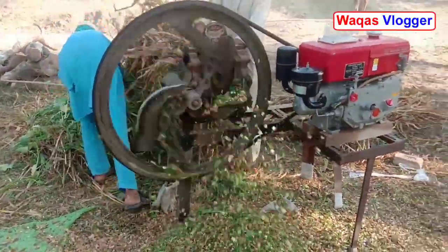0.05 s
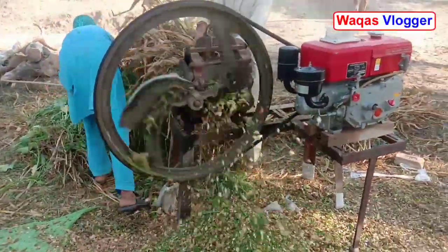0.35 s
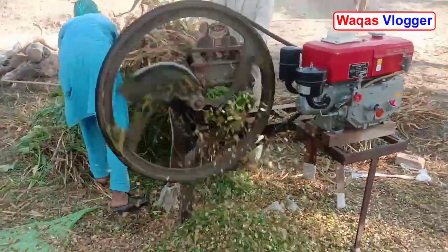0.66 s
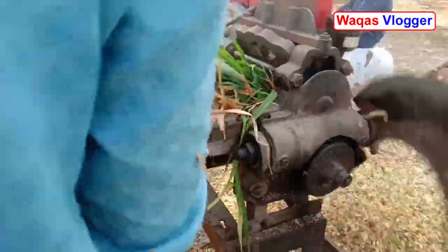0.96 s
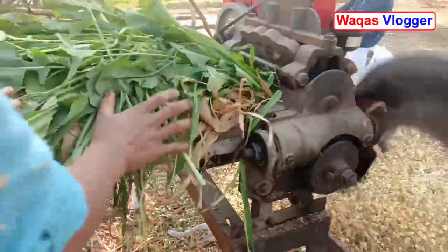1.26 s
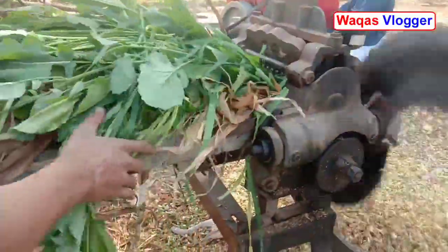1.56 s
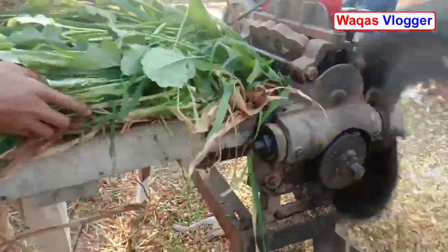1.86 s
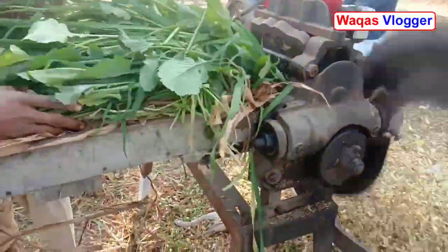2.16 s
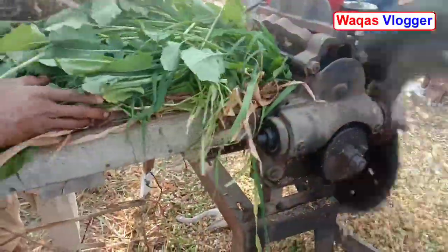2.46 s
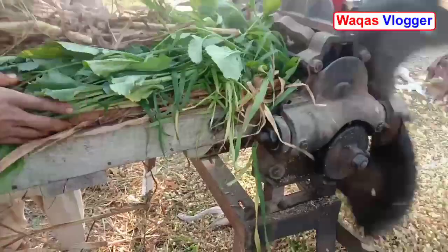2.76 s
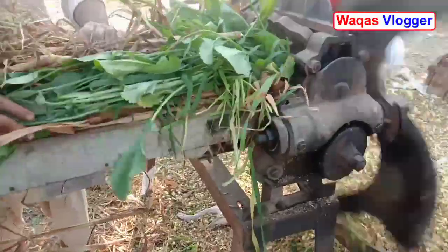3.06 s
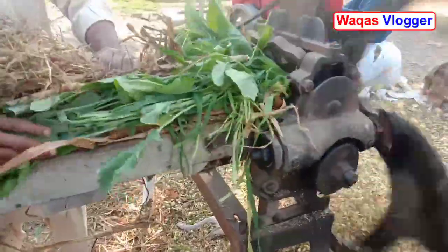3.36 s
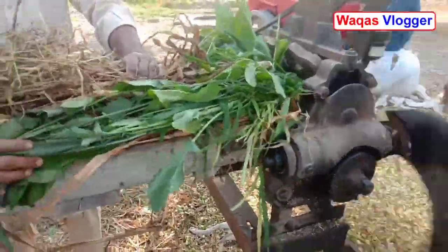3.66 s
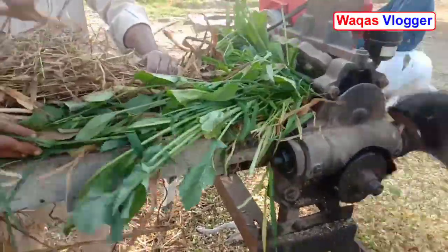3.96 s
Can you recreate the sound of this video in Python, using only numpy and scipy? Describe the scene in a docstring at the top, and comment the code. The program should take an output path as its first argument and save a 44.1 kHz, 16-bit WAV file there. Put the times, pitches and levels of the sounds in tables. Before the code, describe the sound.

A chaff cutter chops green stalks outdoors in fast crunches and metal clacks over a thumping single-cylinder diesel engine. First heard from a few steps away, it fades out briefly and returns close up, with a knife scraping rhythmically.

```python
"""Outdoors by a feed trough, a single-cylinder diesel engine drives a flywheel chaff cutter.
We hear it from a few steps away, then, after a short fade, from beside the trough.
The engine thumps and clatters at 15 cycles a second. Two knives take turns, seven cuts a second:
each crunches through green stalks and ends in a clack, while the gears set the iron frame ringing.
Up close, one knife also scrapes the mouth plate."""
import sys
import numpy as np
from scipy import signal
from scipy.fft import rfft, irfft
from scipy.io import wavfile
from scipy.ndimage import uniform_filter1d

SR = 44100
rng = np.random.default_rng(int(sys.argv[2]) if len(sys.argv) > 2 else 0)


def waveform_to_disk(signal):
    """Save audio, clipped to [-1, 1], as 16-bit WAV at the path in sys.argv[1]."""
    frames = np.transpose(np.atleast_2d(signal))
    scaled = np.clip(frames, -1, 1) * 32767
    samples = np.round(scaled).astype(np.int16)
    wavfile.write(sys.argv[1], SR, samples)


N = 176400
TIME = np.arange(N) / SR
FAR_CUT_S, NEAR_CUT_S = 0.033, 0.044  # length of one crunch

# a knife finishes its cut: end_s, clack_db, thud_db, thud_pitch_hz
CUTS = [(0.001, -11, -12.5, 600), (0.142, -12, -15, 650), (0.284, -9.5, -37, 600), (0.424, -9, -14.5, 640),
        (0.564, -11.5, -35, 547), (0.857, -9.5, -8, 524), (1.001, -10, -10, 695), (1.146, -9, -18, 586),
        (1.29, -9, -11, 447), (1.435, -9, -25, 567), (1.58, -10, -11, 510), (1.723, -7.5, -9.5, 740),
        (1.868, -8, -14, 534), (2.01, -12.5, -8, 685), (2.155, -7.5, -14, 408), (2.297, -9.5, -12.5, 620),
        (2.444, -12.5, -13, 696), (2.584, -11.5, -10, 490), (2.728, -10, -12, 584), (2.871, -9.5, -14, 492),
        (3.016, -10, -26, 790), (3.157, -9, -20, 680), (3.298, -7, -21, 435), (3.443, -8.5, -16, 419),
        (3.582, -10.5, -22, 418), (3.727, -12, -15, 590), (3.87, -8.5, -16, 435)]


def engine(near):
    """Exhaust and intake thump in every cycle, weaker around each cut's end; the combustion knocks."""
    # thumps in one cycle: delay_ms, level_db, pitch_hz, swell_ms, direction (push +1, suck -1)
    far_thumps = [(0.5, -24, 90, 7.7, -1), (1.19, -11, 230, 0.49, -1), (18.9, -12, 256, 1.94, 1),
                  (36.1, -12, 299, 2.4, 1)]
    near_thumps = [(0.43, -13.5, 143, 2.37, -1), (-0.5, -20.5, 98.7, 7.1, -1), (-0.8, -18.5, 520, 1.45, -1),
                   (18.5, -9.5, 482, 1.07, 1), (37.5, -10, 260, 1.36, 1)]
    # tone of the combustion knock: frequency_hz, level_db
    knock_spectrum = [(300, -15), (600, -21), (1000, 20), (1500, 12.5), (2400, -1), (3400, 15), (4100, -33),
                      (15000, -46)]
    first_s, cycle_hz, rise_hz_per_s = (0.7463, 15.103, .06) if near else (-0.0681, 15.432, 0)
    sag_depth_db, sag_lead_s, sag_recovery_s = 8.5, 0.022, 0.033
    spread_db, pitch_spread = 0.76, 0.026
    knock_delay_s, knock_db, echo_db = 0.054, -19.5, -20
    cycles = np.arange(52)
    starts = first_s + cycles / (cycle_hz + rise_hz_per_s * cycles / cycle_hz / 2)
    cut_ends = np.array(CUTS)[:, 0]
    thumps = np.zeros(N)
    for delay_ms, db, hz, swell_ms, direction in (near_thumps if near else far_thumps):
        for s in starts + delay_ms / 1000:
            size, detune = rng.standard_normal(2)
            part = slice(*np.searchsorted(TIME, [s, s + .05]))
            age = TIME[part] - s
            gap_to_cut = np.maximum((cut_ends - s) / sag_lead_s, (s - cut_ends) / sag_recovery_s).min()
            gain = from_db(db - sag_depth_db * np.exp(-gap_to_cut ** 2) + spread_db * size)
            wave = np.sin(2 * np.pi * hz * (1 + pitch_spread * detune) * age)
            thumps[part] += direction * gain * wave * swell(age, swell_ms / 1000)
    # the frame and the ground throw the thumps back faintly
    reflections = rng.standard_normal(SR // 10) * swell(TIME[:SR // 10], peak_s=.01)
    echo = from_db(echo_db) * thumps.std() * rms_one(signal.fftconvolve(thumps, reflections)[:N])
    firings = clicks(starts + knock_delay_s, from_db(rng.normal(knock_db, 0.39, len(starts))))
    knocks = decay(firings, seconds=0.0086) * colour(rng.standard_normal(N), knock_spectrum)
    return thumps + echo + knocks


def stalk_crunch(near):
    """Fine fibres snap and thick stalks crack while a knife passes through the bundle."""
    # tone of the stalks being cut: frequency_hz, level_db
    far_spectrum = [(200, -38), (600, -14), (1400, -8), (2400, -8.5), (3400, 1.5), (4000, -4.5),
                    (4500, -13), (6200, -9.5), (8500, -28), (12500, -16), (14000, -18), (14800, -6),
                    (15500, 0)]
    near_spectrum = [(200, -63), (550, 8), (1000, -1.5), (1600, -5.5), (2500, -2.5), (3300, 2), (4000, -2),
                     (4400, -10), (6400, -11.5), (8000, -24), (11300, -24), (12500, -19.5), (13900, -27),
                     (14700, -18), (15500, -8.5)]
    spectrum, db, cut_s = (near_spectrum, -20, NEAR_CUT_S) if near else (far_spectrum, -19.5, FAR_CUT_S)
    attack_s, release_s, crack_db = 0.0089, 0.012, -3
    load = 0
    for end_s, *_ in CUTS:
        attack = np.clip((TIME - end_s + cut_s) / attack_s, 0, 1)
        release = np.exp(-np.maximum(TIME - end_s, 0) / release_s)
        load += attack * release
    breaks = decay(abs(grains(per_s=260, spread_db=1.6)), seconds=.0005)
    cracks = colour(breaks * rng.standard_normal(N), spectrum)
    bright_cracks = signal.sosfilt(signal.butter(1, 4000, "high", fs=SR, output="sos"), cracks)
    fibres = crackle(spectrum, per_s=4000, spread_db=0.5, flutter_db=1.5)
    return from_db(db) * load * (fibres + from_db(crack_db) * bright_cracks)


def clacks():
    """Knives and loose parts strike the body, which rattles and rings; each cut thuds in the trough."""
    # loose parts clank between the cuts: start_s, level_db
    clanks = [(0.632, -3.5), (0.806, -2), (0.821, -3.5), (1.051, -2.5), (1.34, -0.5), (2.6769, -7),
              (3.066, -2), (3.2696, -6)]
    # tone of the rattle: frequency_hz, level_db
    rattle_spectrum = [(200, -40), (550, 5), (1000, -5.5), (2000, 2.5), (3900, -1), (4400, -26),
                       (6500, -8.5), (8000, -22.5), (13800, -33), (14700, -25), (15500, -24)]
    # modes of the cutter's body: pitch_hz, level_db, t60_s
    body_modes = [(1273, -5, 0.094), (1797, -14, 0.093), (2020, -6, 0.046), (2685, -13.5, 0.073),
                  (3690, -1, 0.015), (4070, -14, 0.021)]
    clank_db, rattle_db, body_db = -10, -5.5, -2
    attack_s, decay_s, scatter_s, thud_lag_s, body_top_hz = .0006, 0.013, 0.002076, 0.00099, 4420
    blows = [(s, db) for s, db, _, _ in CUTS] + [(s, db + clank_db) for s, db in clanks]
    times, blow_db = np.transpose(blows)
    strikes = clicks(times, from_db(blow_db + rattle_db))
    envelope = decay(strikes, decay_s) - decay(strikes, attack_s)
    rattle = envelope * colour(rng.standard_normal(N), rattle_spectrum)
    body = 0
    for hz, mode_db, t60 in body_modes:
        onsets = times + rng.uniform(0, scatter_s, len(times))
        gains = from_db(blow_db + body_db + mode_db + rng.normal(0, 2, len(times)))
        body += ring(clicks(onsets, gains), hz, t60)
    body = signal.sosfilt(signal.butter(4, body_top_hz, fs=SR, output="sos"), body)
    thuds = sum(tone_burst(s + thud_lag_s, hz, db, swell_s=0.0024) for s, _, db, hz in CUTS)
    return rattle + body + thuds


def knife_scrapes():
    """An edge judders along the mouth plate and sings, touches once more, and pings where it catches."""
    # one knife rubs the plate once a turn: start_s, level_db
    rubs = [(0.866, -23), (1.159, -25.5), (1.447, -27), (1.735, -26.5), (2.02, -25), (2.311, -21.5),
            (2.595, -24.5), (2.878, -24), (3.167, -23.5), (3.455, -22), (3.734, -20)]
    # tone of the grinding: frequency_hz, level_db
    grind_spectrum = [(1500, -18), (2600, 16.5), (3400, 15), (4400, 1), (5300, 8), (6200, 12.5), (6500, -1),
                      (6900, 5), (8300, 1), (9800, 4.5), (11500, -1.5), (13800, -17), (14600, 9),
                      (15500, -45.5)]
    # the edge catches: start_s, pitch_hz, level_db
    catches = [(1.335, 6500, -28), (1.435, 6400, -26), (1.617, 6280, -37), (1.641, 6560, -35),
               (2.025, 6550, -23), (2.312, 6660, -37), (2.59, 6430, -29), (2.884, 6500, -26),
               (3.492, 6470, -25), (3.74, 6570, -21)]
    # modes of the rubbed edge: pitch_hz, level_db
    edge_modes = [(5650, -24), (6500, -12), (7780, -20.5), (9700, -27), (10900, -34)]
    swell_s, rebound_s, rebound_db = 0.012, 0.047, -11
    pressure = 0
    for s, db in rubs:
        rebound = from_db(rebound_db) * swell(TIME - s - rebound_s, swell_s / 2)
        pressure += from_db(db) * (swell(TIME - s, swell_s) + rebound)
    squeal = sum(from_db(db) * rms_one(ring(rng.standard_normal(N), hz, t60=0.083))
                 for hz, db in edge_modes)
    grinding = crackle(grind_spectrum, per_s=5000, spread_db=0.8, flutter_db=2.5)
    judder = from_db(drift(rate_hz=150))
    pings = sum(tone_burst(s, hz, db, swell_s=0.0066) for s, hz, db in catches)
    return pressure * (rms_one(grinding * judder) + squeal) + pings


def iron_rings():
    """Tapping gear teeth make the frame sing and the gears chink; a knife in the stalks damps both."""
    # modes of the frame and gears: pitch_hz, level_db, t60_s, taps_per_s, steadiness (0-1)
    iron_modes = [(1266, -27, 0.061, 900, 0.4), (2705, -35.5, 0.056, 67, 0),
                  (3317, -32.5, 0.025, 130, 0.25), (6100, -48.5, 0.046, 17, .15),
                  (6600, -46, 0.062, 33, 0.3)]
    damping = 0.55
    ringing = 0
    for hz, db, t60, taps_per_s, steadiness in iron_modes:
        tone = rms_one(ring(grains(taps_per_s, spread_db=0.36), hz, t60))
        power = uniform_filter1d(tone ** 2, size=600) + .01
        ringing += from_db(db) * rms_one(tone / power ** (steadiness / 2))
    cutting = sum(np.exp(-((TIME - end_s) / (NEAR_CUT_S / 2) + 1) ** 2) for end_s, *_ in CUTS)
    return ringing * (1 - damping * cutting)


def clatter(near):
    """Valve gear, belt and feed gears make a bed of dense small contacts."""
    # tone of the running machinery: frequency_hz, level_db
    far_spectrum = [(60, -13), (130, -5.5), (280, -11), (580, 0), (750, -5), (1300, -3.5), (1650, -9.5),
                    (2500, -14.5), (3200, -7), (4000, -17), (4600, -24), (6500, -23.5), (8400, -38),
                    (14000, -32.5), (15200, -23)]
    near_spectrum = [(60, -13), (85, -4), (200, 1.5), (550, 2), (900, -3.5), (1500, -6), (2300, -6),
                     (3400, -9.5), (4000, -7.5), (4300, -18.5), (6500, -16.5), (7600, -27.5),
                     (14000, -29.5), (14700, -14), (15500, -31)]
    spectrum, db = (near_spectrum, -22.5) if near else (far_spectrum, -20.5)
    return from_db(db) * crackle(spectrum, per_s=5000, spread_db=0.5, flutter_db=3.5)


def crackle(spectrum, per_s, spread_db, flutter_db):
    """Dense snaps in five bands, each band fluttering in level on its own; unit power."""
    # bands from dull snaps to bright ones: low_hz, high_hz
    bands = [(30, 900), (900, 2200), (2200, 4500), (4500, 9000), (9000, 17000)]
    snaps = 0
    for band in bands:
        bandpass = signal.butter(2, band, "band", fs=SR, output="sos")
        band_snaps = signal.sosfilt(bandpass, grains(per_s, spread_db))
        snaps += band_snaps * from_db(flutter_db * drift(rate_hz=62))
    return colour(snaps, spectrum)


def tone_burst(start_s, hz, db, swell_s):
    """A resonance swells quickly and dies away."""
    out = np.zeros(N)
    part = slice(*np.searchsorted(TIME, [start_s, start_s + .08]))
    age = TIME[part] - start_s
    out[part] = from_db(db) * np.sin(2 * np.pi * hz * age) * swell(age, swell_s)
    return out


def ring(x, hz, t60):
    """Each click sets a sine ringing that falls 60 dB in t60 seconds."""
    radius, angle = np.exp(-np.log(1000) / (t60 * SR)), 2 * np.pi * hz / SR
    return signal.lfilter([0, np.sin(angle)], [1, -2 * radius * np.cos(angle), radius ** 2], x + 1e-18)


def grains(per_s, spread_db):
    """Random clicks of uneven size."""
    sizes = from_db(spread_db * np.minimum(rng.exponential(1, N), 4))
    return sizes * rng.choice([-1, 1], N) * (rng.random(N) < per_s / SR)


def clicks(times, gains):
    """One click at each time."""
    out = np.zeros(N)
    at = np.round(times * SR).astype(int)
    inside = (at >= 0) & (at < N)
    out[at[inside]] = gains[inside]
    return out


def decay(x, seconds):
    """Each click starts an exponential decay."""
    return signal.lfilter([1], [1, -np.exp(-1 / (seconds * SR))], x + 1e-18)


def swell(age, peak_s):
    """An envelope that rises to one at peak_s and dies away."""
    progress = np.maximum(age, 0) / peak_s
    return progress * np.exp(1 - progress)


def drift(rate_hz):
    """A smooth random wobble with a spread of one."""
    pole = np.exp(-2 * np.pi * rate_hz / SR)
    return rms_one(signal.lfilter([1], [1, -2 * pole, pole ** 2], rng.standard_normal(N + SR))[SR:])


def colour(x, spectrum):
    """Equalise through (frequency_hz, level_db) points, rolling off below the first; unit power."""
    hz, db = np.transpose(spectrum)
    bins_hz = np.maximum(np.fft.rfftfreq(N, 1 / SR), 1)
    curve = from_db(np.interp(np.log(bins_hz), np.log(hz), db))
    roll_off = np.minimum(bins_hz / hz[0], 1) ** 2
    return rms_one(irfft(rfft(x) * curve * roll_off, N))


def from_db(db):
    """Decibels to gain."""
    return 10 ** (np.asarray(db) / 20)


def rms_one(x):
    """Scale to unit power."""
    return x / np.sqrt(np.mean(x ** 2) + 1e-20)


def scene():
    """The machine from a few steps away fades out, then fades in beside the trough."""
    # fades of the two positions: time_s, gain (0-1)
    far_fade = [(0.615, 1), (0.66, .33), (0.704, 0)]
    near_fade = [(0.761, 0), (0.785, .55), (0.81, 1)]
    blows, rings = clacks(), iron_rings()
    far = engine(near=False) + clatter(near=False) + stalk_crunch(near=False)
    far += blows + from_db(-7) * rings
    near = engine(near=True) + clatter(near=True) + stalk_crunch(near=True)
    near += blows + rings + knife_scrapes()
    far *= np.interp(TIME, *np.transpose(far_fade))
    near *= np.interp(TIME, *np.transpose(near_fade))
    return (far + near)[None]


def record(dry):
    """The microphone loses the deepest bass, peaks are rounded and the top is cut."""
    low_cut_hz, high_cut_hz, ceiling = 58, 15600, .95
    thin = signal.sosfiltfilt(signal.butter(2, low_cut_hz, "high", fs=SR, output="sos"), dry)
    rounded = thin / (1 + (thin / ceiling) ** 8) ** .125
    return signal.sosfilt(signal.ellip(12, .2, 90, high_cut_hz, fs=SR, output="sos"), rounded)


dry = scene()
out = record(dry)
waveform_to_disk(out)
```